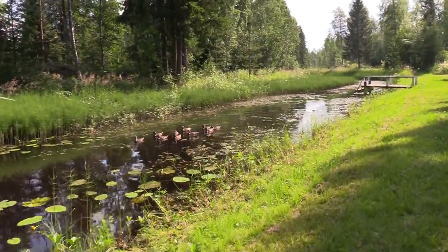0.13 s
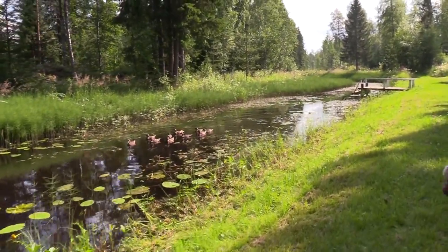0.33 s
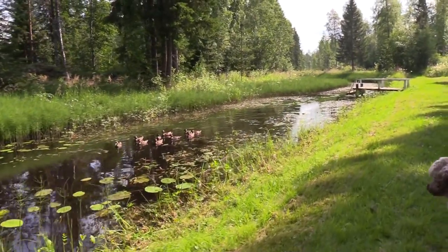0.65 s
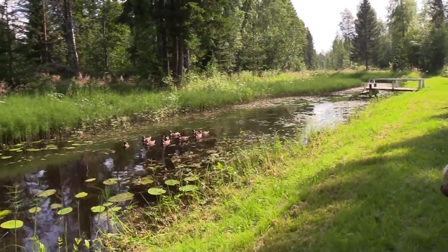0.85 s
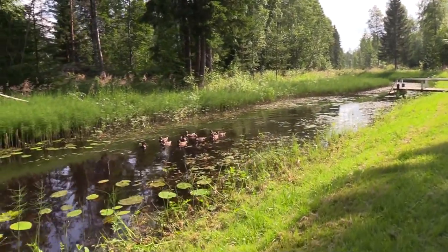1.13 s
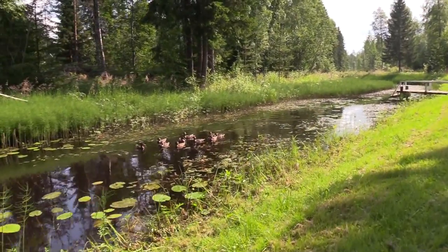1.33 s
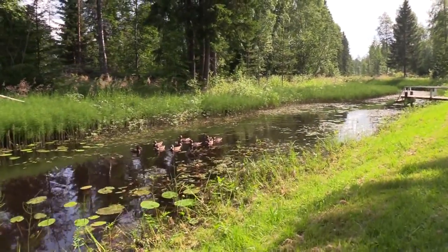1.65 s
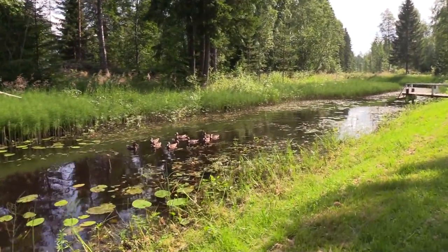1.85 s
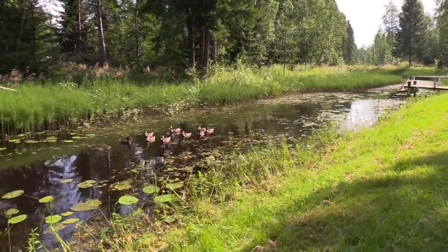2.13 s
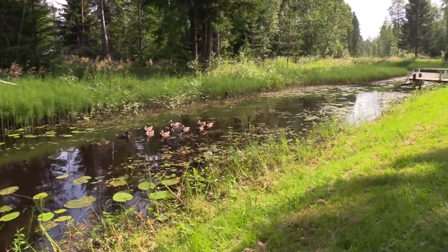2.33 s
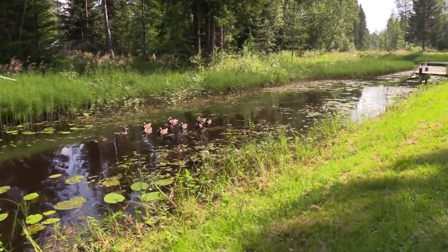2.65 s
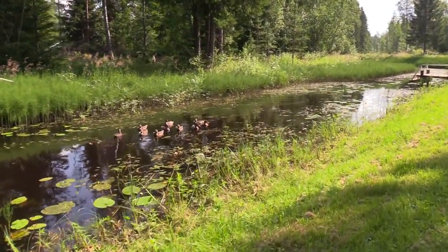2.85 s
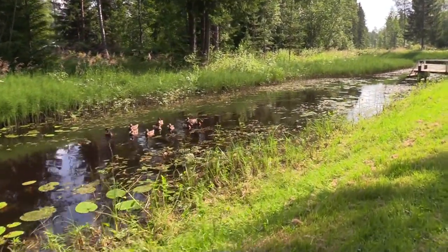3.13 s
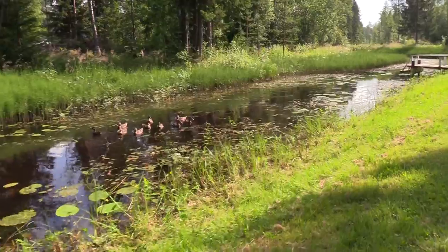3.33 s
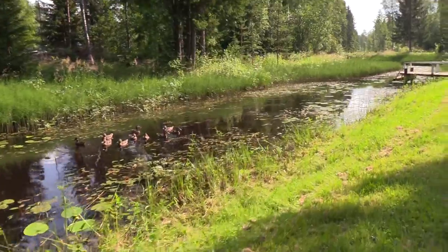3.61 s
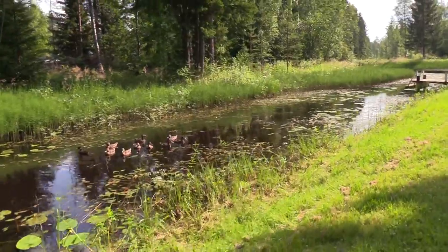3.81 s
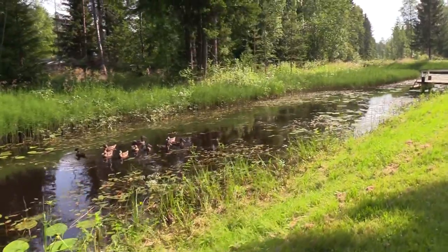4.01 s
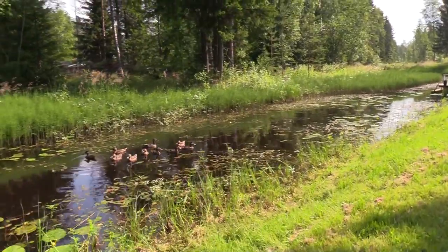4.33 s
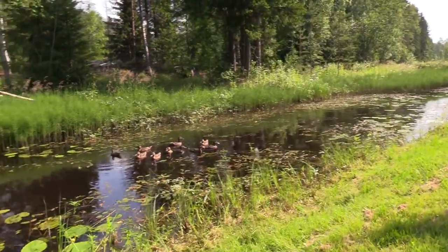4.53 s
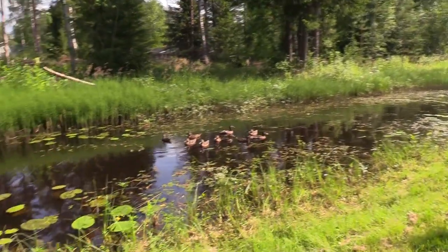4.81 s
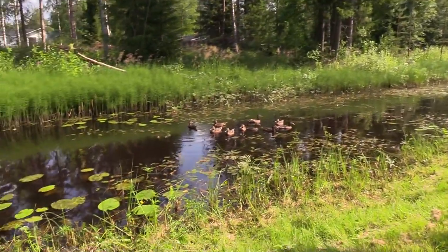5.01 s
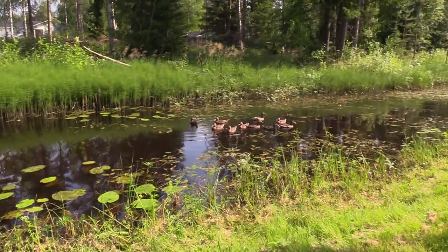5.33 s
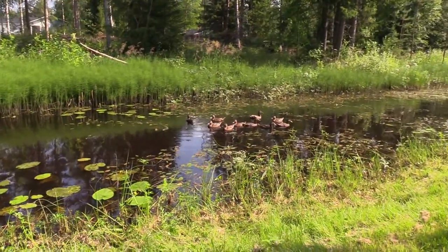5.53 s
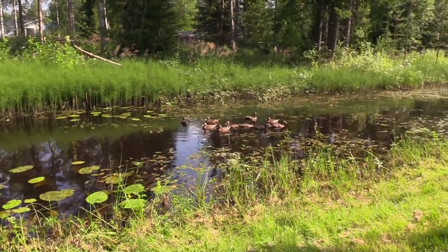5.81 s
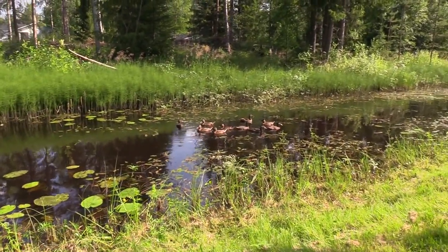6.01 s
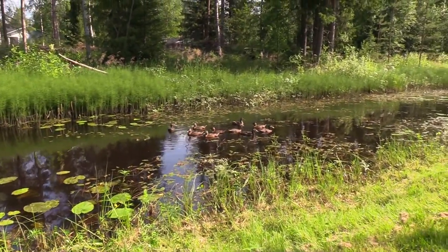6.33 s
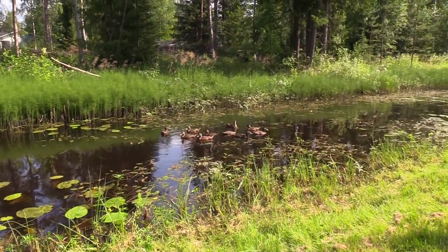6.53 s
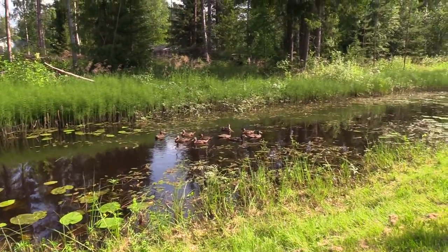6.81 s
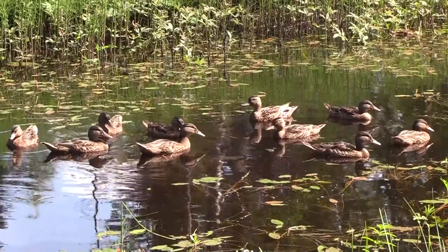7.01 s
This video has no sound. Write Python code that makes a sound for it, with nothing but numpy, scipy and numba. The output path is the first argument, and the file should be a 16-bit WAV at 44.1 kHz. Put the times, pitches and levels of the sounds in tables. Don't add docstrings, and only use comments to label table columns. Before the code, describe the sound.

Spaced, nasal duck quacks echo off woods around a narrow pond, over close rustling, small clicks, low handling bumps and faint leafy hiss.

```python
import sys
import numpy as np
from scipy import signal
from scipy.io import wavfile
from scipy.ndimage import uniform_filter1d
from numba import njit

SR = 44100
rng = np.random.default_rng(int(sys.argv[2]) if len(sys.argv) > 2 else 0)


def master_out(mix):
    frames = np.transpose(np.atleast_2d(mix))
    ceiling = np.clip(frames, -1, 1)
    pcm = np.round(ceiling * 32767).astype(np.int16)
    wavfile.write(sys.argv[1], SR, pcm)


def linear_from_db(decibels):
    return 10 ** (np.asarray(decibels, float) / 20)


N = 315756


def noise():
    return rng.standard_normal(N)


def walk(rate_hz):
    hold = int(SR / rate_hz)
    return uniform_filter1d(np.repeat(rng.standard_normal(N // hold + 1), hold), hold)[:N]


def level(x, db):
    return x * linear_from_db(db) / np.sqrt(np.mean(x ** 2))


def steady(x):
    return x / np.sqrt(uniform_filter1d(x ** 2, size=900) + 1e-12)


def curves(table):
    s, *columns = np.transpose(table)
    return [np.interp(np.arange(N) / SR, s, c) for c in columns]


def panned(x, pan_db):
    return np.array([x * linear_from_db(pan_db / 2), x * linear_from_db(-pan_db / 2)])


def add(out, s, sound):
    i = int(s * SR)
    out[i:i + len(sound)] += sound[:N - i]


@njit
def svf(x, hz, width):
    y, b, l = np.empty(len(x)), 0., 0.
    for i in range(len(x)):
        g, k = np.tan(np.pi * hz[i] / SR), width / hz[i]
        v = (b + g * (x[i] - l)) / (1 + g * (g + k))
        b, l, y[i] = 2 * v - b, l + 2 * g * v, k * v
    return y


def band(x, hz, width_hz):
    return svf(x, hz * np.ones(len(x)), float(width_hz))


def band2(x, hz, first_width_hz, second_width_hz):
    return band(band(x, hz, first_width_hz), hz, second_width_hz)


# voice start in seconds, break into strong-weak beats in seconds, cut-off in seconds.
QUACKS = [
    (-.15, -.12, .05),
    (.729, .752, .886),
    (1.575, 1.6, 1.748),
    (2.65, 2.688, 2.816),
    (3.517, 3.556, 3.696),
    (4.277, 4.298, 4.481),
    (5.09, 5.105, 5.295),
    (6.0, 6.022, 6.204),
    (6.89, 6.936, 7.082),
]
# peak in dB, open bill resonance in Hz,
# rasp over the voice in dB, first rasp band in Hz, second rasp band in Hz.
EFFORT = [(-25.5, 1925, -18, 3600, 5300), (-26, 1850, -16, 6060, 4400), (-23.5, 1894, -13, 6100, 6200),
          (-24.5, 1887, -11.5, 6050, 6500), (-25.5, 1867, -18, 4400, 8900), (-21, 1935, -17, 5200, 8500),
          (-21, 1915, -18.5, 5540, 8500), (-21.5, 1915, -18.5, 4800, 8800), (-21, 2020, -20, 6300, 4100)]
# lead-in in Hz, dip at the break in Hz, bill open in Hz, swell in Hz, last in Hz.
PITCH = [(420, 380, 395, 400, 390), (443.1, 380, 396, 390, 382), (431, 374, 388, 393, 395),
         (408.8, 382, 394, 387, 392), (414.6, 378, 391, 388, 384), (418.5, 360, 374, 380, 386),
         (390.3, 338, 370, 388, 394), (444.4, 348, 388, 396, 384), (423.4, 398, 426, 420, 420)]
# seconds after the break, weakness of every second pulse [0-1],
# strength of every fourth [0-1], roughness [0-1].
BEATING = [(.05, .55, .1, .15), (.07, .55, .15, .17), (.042, .45, 0, .05), (.08, .5, .12, .07),
           (.095, .5, .05, .06), (.05, .6, .18, .16), (.08, .6, .18, .15), (.05, .45, .17, .17),
           (.07, .68, .18, .14)]
# level against the peak in dB, bill opening share, rasp against its full level in dB.
STAGES = [
    (-31, .61, 2),
    (-25.5, 0.69, -8),
    (-12, 0.63, -1),
    (-7, 0.84, 0),
    (-3.5, 0.98, -2.7),
    (-1.23, 1.012, 0.5),
    (-0.6, 1.039, 0.5),
    (-1.94, 1.013, 2),
]


def isolated(calls, quiet_db=-118, fade_s=0.0078):
    rows = []
    for call in calls:
        (first_s, _, *first), (last_s, last_db, *last) = call[0], call[-1]
        rows += [(first_s - fade_s, quiet_db, *first), *call]
        rows += [(last_s + fade_s, last_db - 20, *last), (last_s + 2 * fade_s, quiet_db, *last)]
    return rows


def stages():
    lead_s, whistle_s, open_s, close_s = .034, .011, .03, .02
    entry_s, entry_sharp, lead_flat = .007, 1.045, .92
    rasp_start_hz, break_rough = 4750, .29
    shape, pitch, beat = [], [], []
    for quack, effort, hz, (settle, *beats) in zip(QUACKS, EFFORT, PITCH, BEATING):
        on, brk, off = quack
        db, bill_hz, rasp_db, *rasp_hz = effort
        opened, peak = brk + open_s, off - close_s
        swell = opened + .55 * (peak - opened)
        times = [on - lead_s, on - whistle_s, on, brk, opened, swell, peak, off]
        call = []
        for s, (stage_db, share, stage_rasp_db) in zip(times, STAGES):
            colour = rasp_hz if s >= brk else [rasp_start_hz, rasp_start_hz]
            call.append((s, db + stage_db, bill_hz * share, rasp_db + stage_rasp_db, *colour))
        shape.append(call)
        pitch += [(on - lead_s, lead_flat * hz[0]), (on - 2 * entry_s, hz[0]),
                  (on + entry_s, entry_sharp * hz[1]), *zip([brk, opened, swell, off], hz[1:])]
        beat += [(brk - .025, 0, 0, .07), (brk, .4, .15, break_rough),
                 (brk + settle / 2, *beats[:2], break_rough), (brk + settle, *beats), (off + lead_s, *beats)]
    return curves(isolated(shape)), curves(pitch)[0], curves(beat)


def folds(hz, half, quarter, rough, chance):
    weak_late, jitter = 0.13, .1
    turns = np.cumsum(hz) / SR
    k = np.arange(1, int(turns[-1]) - 1)
    at = np.interp(k, turns, np.arange(N))
    i = at.astype(int)
    size_chance, time_chance = chance[:len(k)].T
    size = (1 - half[i] * (k % 2)) * (1 + quarter[i] * np.cos(np.pi * k / 2))
    size = size * np.maximum(1 + 0.15 * rough[i] * size_chance, .1)
    at = at + (weak_late * half[i] * (k % 2) + jitter * rough[i] * time_chance) * SR / hz[i]
    i = np.clip(at.astype(int), 0, N - 2)
    share = np.clip(at - i, 0, 1)
    return np.bincount(i, size * (1 - share), N) + np.bincount(i + 1, size * share, N)


# centre in Hz, width in Hz, level in dB.
THROAT = [(202, 168, -16.5), (347, 85, -9.5), (920, 890, -9.5), (1330, 112, -4.5), (2200, 53, -1)]


def throat_and_bill(source, calm, bright_hz):
    bill_width_hz = 426
    openness = bright_hz / 1900
    bill_hz = 1.002 * bright_hz
    bill = band2(source, bill_hz, 2.82 * bill_width_hz, bill_width_hz) * openness ** 5.5
    throat = 0
    for k, (hz, width, db) in enumerate(THROAT):
        mode = band2(calm if hz < 1000 else source, hz, 2.5 * width, width)
        throat = throat + (-1) ** k * linear_from_db(db) * mode * np.clip(1.1 * bill_hz / hz, 0, 1) ** 2.9
    both = bill + throat
    tract = signal.sosfilt(signal.butter(8, 2404, fs=SR, output="sos"), both)
    upper = band(band(both, 1.445 * bill_hz, 800), 1.44 * bill_hz, 800)
    tract = tract + linear_from_db(-15.0) * upper * openness ** 4.0
    shut = signal.sosfilt(signal.butter(4, 1700, fs=SR, output="sos"), tract)
    return shut + (tract - shut) * np.clip(bright_hz / 1500, 0, 1) ** 2.5


# centre in Hz, width in Hz, level in dB.
RASP = [(3690, 3000, 11), (5900, 3170, 7.5), (7800, 240, -28), (10500, 2500, -4)]


def rasping_air(air, bright_hz, rasp_hz, side_hz):
    pipe_hz, pipe_ring = 995, .33
    rasp = sum(linear_from_db(db) * band2(air, hz, 3.7 * width, width) for hz, width, db in RASP)
    rasp = rasp * (bright_hz / 1900) ** 3.5
    rasp = rasp + linear_from_db(11.5) * band2(air, rasp_hz, 1500, 1000)
    rasp = rasp + linear_from_db(4.5) * band2(air, side_hz, 1600, 1400)
    rasp = signal.lfilter([1], [1, *np.zeros(round(SR / pipe_hz) - 1), -pipe_ring], rasp)
    return signal.sosfilt(signal.butter(4, [3150, 10500], "bandpass", fs=SR, output="sos"), rasp)


@njit
def woods(x, lags, gain, damp):
    line, soft, out = np.zeros((8, 8192)), np.zeros(8), np.zeros((2, len(x)))
    for i in range(len(x)):
        total = 0.
        for k in range(8):
            soft[k] += (1 - damp) * (gain[k] * line[k, (i - lags[k]) & 8191] - soft[k])
            total += soft[k]
            out[k % 2, i] += soft[k]
        for k in range(8):
            line[k, i & 8191] = x[i] + soft[k] - total / 4
    return out


def woods_echo(voice):
    t60_s, damp = 0.98, 0.54
    lags = rng.integers(350, 4000, 8)
    shaken = np.arange(N) + 22.0 * uniform_filter1d(walk(23), size=1000)
    voice = np.interp(shaken, np.arange(N), voice)
    wash = woods(voice + 1e-18, lags, linear_from_db(-60 * lags / SR / t60_s), damp)
    wash = wash + .5 * wash[::-1]
    t = np.arange(12000) / SR
    scatter = rng.standard_normal((2, len(t))) * 1000. ** (-t / 0.42) * (1 - np.exp(-t / 0.0016))
    tail = signal.fftconvolve(voice[None], scatter, axes=1)[:, :N]
    echo = linear_from_db(-23.5) * wash + linear_from_db(-40.5) * tail
    return np.array([band(e, 4000, 2800) + 1.18 * band2(e, 5540, 7800, 7800) for e in echo])


# time in seconds, left minus right in dB.
TURN = [(0, 2.5), (4.5, 2.5), (5.1, 3.5), (6.2, 4), (7, 3.5)]


def hen():
    (db, bright_hz, rasp_db, rasp_hz, side_hz), hz, (half, quarter, rough) = stages()
    db = np.where(np.abs(np.arange(N) / SR - 6.876 + .1) < .1, -118, db)
    chance = rng.standard_normal((4000, 2))
    pulses = folds(hz, half, quarter, rough, chance)
    calm_pulses = folds(hz, half, quarter, .8 * rough, chance)
    puff = signal.lfilter([1], [1, -np.exp(-1 / (0.0028 * SR))], pulses) * noise()
    tract = throat_and_bill(pulses + 0.3 * rough * puff, calm_pulses + .2 * rough * puff, bright_hz)
    faint = np.clip((-39.5 - db) / 10, 0, 1)
    whistle = faint * (half <= 1 / 4)
    tone = np.sin(4 * np.pi * np.cumsum(hz) / SR)
    tract = (1 - 0.47 * whistle) * steady(tract) + 1.3 * whistle * tone
    rasp = rasping_air(puff + 3 * pulses, bright_hz, rasp_hz, side_hz)
    voice = linear_from_db(db) * (tract + linear_from_db(rasp_db) * steady(rasp))
    pop = np.hanning(700) * np.sin(2 * np.pi * 520 * np.arange(700) / SR)
    for (_, _, off), (peak_db, *_) in zip(QUACKS, EFFORT):
        add(voice, off - .004, linear_from_db(peak_db - 16.0) * pop)
    return panned(voice, curves(TURN)[0]) + woods_echo(voice)


# start in seconds, rise in seconds, fall in seconds,
# level in dB, treble over that level in dB.
RUSTLE = [(0.088, 0.014, 0.25, -53, -4), (.42, 0.27, 0.037, -51, -3.5), (.93, .52, .08, -56, -4),
          (1.77, 0.16, 0.048, -56, 5), (1.949, 0.025, 0.077, -33.5, -22.5), (2.052, .015, .055, -48, -9),
          (2.125, 0.028, 0.55, -61.5, -4), (2.82, 0.026, .1, -65, -58), (2.96, 0.45, .05, -65, 4.5),
          (3.8, 0.073, .06, -67, 1), (3.919, 0.24, 0.08, -56, -3.5), (4.7, 0.16, .035, -54.5, -10),
          (4.864, 0.039, 0.046, -46.5, -10), (4.964, 0.033, 0.032, -44, -5), (5.4, 0.12, 0.053, -68.5, 9),
          (5.93, 0.017, 0.016, -75, -64)]
# start in seconds, length in seconds, level in dB, centre in Hz.
SWISHES = [
    (1.715, 0.068, -42, 12900),
    (2.503, 0.27, -48.5, 9300),
]


def rustle():
    t, low, high = np.arange(N) / SR, 0, 0
    for start, rise, fall, db, treble_db in RUSTLE:
        top, end = start + rise, start + rise + fall
        edge_db = db - 12.5
        brush_db = np.interp(t, [start - .03, start, top, end, end + 0.032], [-90, edge_db, db, edge_db, -90])
        low = low + linear_from_db(brush_db)
        high = high + linear_from_db(brush_db) * linear_from_db(treble_db)
    grains = noise() * linear_from_db(2.6 * rng.exponential(size=N) + 3 * walk(200))
    dull = band(band(grains, 1100, 800), 940, 2700)
    dull = level(dull + 0.51 * band(band(grains, 2160, 3000), 1890, 1700), 0)
    bright = level(band(band(grains, 3000, 7700), 5000, 8300), 0)
    air, swish = noise(), 0
    for s, length, db, hz in SWISHES:
        fade = np.clip(np.minimum(t - s, s + length - t) / (0.25 * length), 0, 1)
        swish = swish + linear_from_db(db) * fade * band2(air, hz, hz / 2, hz / 2)
    return panned(low * dull, 8.3) + high * bright + swish


# time in seconds, ring peak in dB, ring in Hz, click in dB.
TICKS = [(0.13, -44, 1260, -22), (0.153, -28.5, 1170, -54), (0.267, -83, 629, -30),
         (0.417, -33, 936, -37.5), (0.452, -51, 646, -29.5), (0.566, -52, 1030, -35),
         (0.638, -31.5, 795, -54), (0.939, -29.5, 1110, -32.5), (1.067, -35.5, 870, -65),
         (1.14, -36.5, 1330, -61), (1.218, -59, 877, -35), (1.268, -42, 1030, -30), (1.389, -39, 675, -47),
         (2.048, -25.5, 970, -51), (2.08, -35, 1320, -41), (2.204, -52, 696, -28.5), (2.335, -53, 662, -33),
         (2.459, -53, 810, -27.5), (3.098, -57, 850, -34.5), (3.332, -72, 785, -37), (3.374, -61, 750, -38),
         (3.473, -39, 781, -54), (4.079, -58, 710, -35), (4.138, -38, 895, -35), (4.824, -40, 940, -55),
         (4.869, -38, 2570, -39), (4.934, -56, 717, -52), (5.499, -39, 2052, -34.5), (5.949, -42, 691, -66)]
# start in seconds, length in seconds, first pitch in Hz, last pitch in Hz, level in dB.
SQUEAKS = [(0.319, 0.013, 2640, 2800, -44), (2.08, 0.0075, 6680, 6500, -42.5),
           (4.82, 0.0062, 3230, 3460, -53), (5.005, 0.0041, 1792, 1493, -30),
           (4.6292, 0.0046, 5900, 6850, -27.5), (4.634, 0.0057, 6860, 7400, -36),
           (4.639, 0.0065, 7460, 6040, -40), (4.63, 0.013, 1980, 2500, -31.5),
           (4.645, 0.0063, 2130, 1790, -21.5), (4.648, .012, 616, 595, -41),
           (4.649, 0.006, 1520, 1350, -26), (4.651, 0.015, 1070, 1020, -32.5),
           (4.653, 0.0036, 1700, 1880, -22.5), (4.99, 0.0038, 7400, 6700, -47),
           (4.994, 0.017, 9100, 1300, -38)]


def ticks():
    out, click, scrape = np.zeros(N), np.zeros(N), np.zeros(N)
    t = np.arange(4000) / SR
    for s, db, hz, click_db in TICKS:
        add(out, s, linear_from_db(db - 3.0) * np.sin(2 * np.pi * hz * t) * 1000. ** (-t / (20.0 / hz)))
        add(click, s, linear_from_db(click_db) * rng.standard_normal(200) * np.exp(-t[:200] / 0.00075))
    for s, length, hz0, hz1, db in SQUEAKS:
        hz = np.linspace(hz0, hz1, int(length * SR))
        grip = 1 + 2.5 * uniform_filter1d(rng.standard_normal(len(hz)), size=30)
        glide = np.sin(2 * np.pi * np.cumsum(hz) / SR)
        add(out, s, linear_from_db(db) * np.hanning(len(hz)) ** 0.32 * grip * glide)
    add(scrape, 4.642, linear_from_db(-25.0) * np.hanning(720) * rng.standard_normal(720))
    clicks = band(band(click, 6200, 6200), 6000, 12000)
    return panned(out + band(scrape, 2720, 4700), 6.3) + linear_from_db(-1.5) * clicks


# frequency in Hz, 60 dB decay in seconds, level in dB.
BODY = [(80.6, 0.56, 10), (103.33, 0.59, 5.5), (114.4, 1, -24), (185.6, 0.9, -16), (277.5, 0.24, -10),
        (61, 0.9, -35)]


def body_ring(x):
    return sum(linear_from_db(db) * band(x, hz, np.log(1000) / np.pi / t60) for hz, t60, db in BODY)


# time in seconds, peak in dB.
KNOCKS = [(0.25, -25.5), (1.717, -38), (1.959, -37.5), (2.144, -33), (2.692, -34.5), (3.304, -42.5),
          (4.009, -36.5), (4.59, -33.5), (4.881, -30.5), (5.069, -26), (5.201, -31.5), (5.609, -36),
          (5.702, -32), (6.341, -35)]
# time in seconds, level in dB.
GRIP = [(0, -38.5), (.18, -53), (.26, -30), (.56, -67.5), (.8, -40.5), (1.45, -49.5), (2.21, -41.5),
        (2.53, -50.5), (2.73, -38.5), (3.0, -42), (3.63, -42), (3.93, -56), (4.03, -39.5), (4.25, -44),
        (5.1, -38), (5.72, -43.5), (6.34, -52), (7.16, -50)]
# time in seconds, level in dB.
GUST = [(0.0, -41), (0.28, -35), (0.38, -43), (0.46, -30.5), (0.64, -40), (4.03, -36.5), (4.07, -42.5),
        (5.08, -32.5), (6.02, -45.5), (6.04, -38), (6.92, -39), (7.16, -47)]


def handling():
    shake_db, rumble_db = curves(GRIP)[0], curves(GUST)[0] + 1.7
    blows = np.zeros(N)
    for s, db in KNOCKS:
        add(blows, s, -linear_from_db(db) * np.hanning(130))
    shake = linear_from_db(shake_db) * level(body_ring(noise()), -5.0)
    air = band(band(band(noise(), 12.7, 17.5), 12.9, 22.3), 13.3, 14.6)
    rumble = linear_from_db(rumble_db) * level(air, 0)
    sway = linear_from_db(shake_db) * level(band(noise(), 86, 35), -12) * np.array([[1], [-1]])
    return panned(linear_from_db(19.5) * body_ring(blows) + linear_from_db(-37) * blows + shake + rumble, 2.5) + sway


# frequency in Hz, density in dB per Hz.
HISS = [(82, -31), (140, -1.5), (644, -9), (952, -12), (1460, -17), (2040, -14), (3200, -21), (12800, -22),
        (14100, -24.5), (15000, -50)]


def hiss():
    out, (curve_hz, curve_db) = 0, np.transpose(HISS)
    for hz in 150 * 2 ** np.arange(0, 6.6, .5):
        mid, side = (band2(noise(), hz, hz / 2, hz / 2) for _ in range(2))
        db = np.interp(np.log(hz), np.log(curve_hz), curve_db) + 1.0 * walk(16.0)
        out = out + linear_from_db(db) * (mid * np.array([[1.1], [.9]]) + 0.95 * side * np.array([[1], [-1]]))
    return level(out, -54.5)


def scene():
    return hen() + rustle() + ticks() + handling() + hiss()


def low_pass(x):
    return signal.sosfilt(signal.butter(12, 15190, fs=SR, output="sos"), x)


def record(dry):
    mid, side = (dry[0] + dry[1]) / 2, (dry[0] - dry[1]) / 2
    side = signal.sosfiltfilt(signal.butter(8, 3150, fs=SR, output="sos"), side)
    mid = signal.sosfilt(signal.ellip(8, .2, 70, 14500, fs=SR, output="sos"), mid)
    return low_pass(np.array([mid + side, mid - side]))


dry = scene()
out = record(dry)
master_out(out)
```